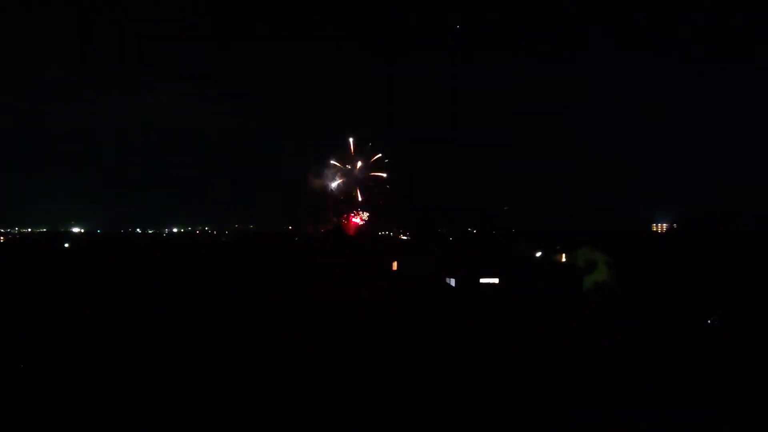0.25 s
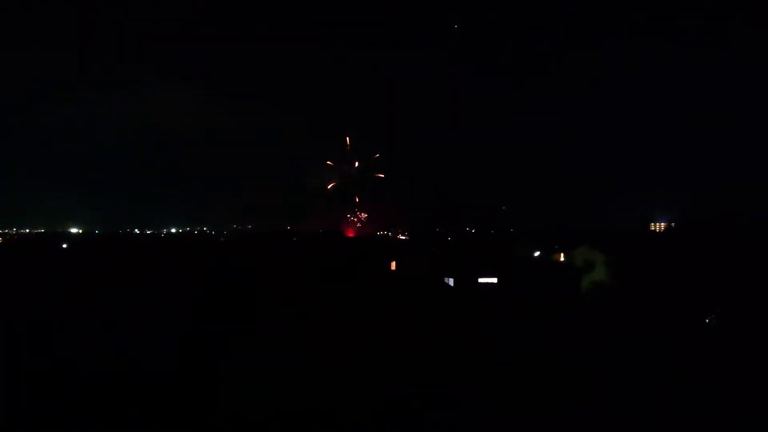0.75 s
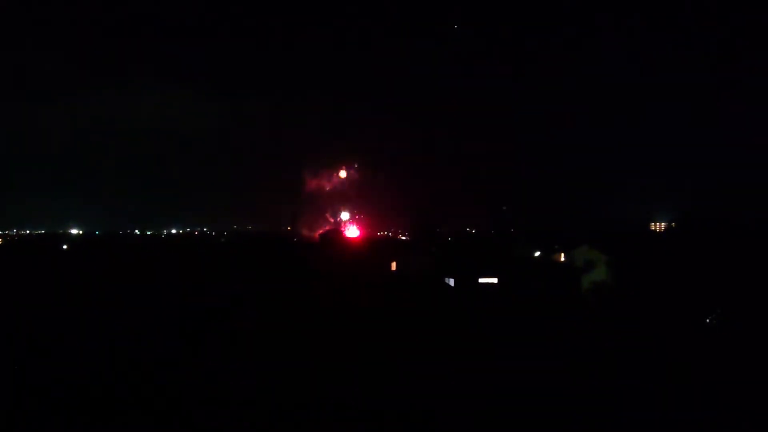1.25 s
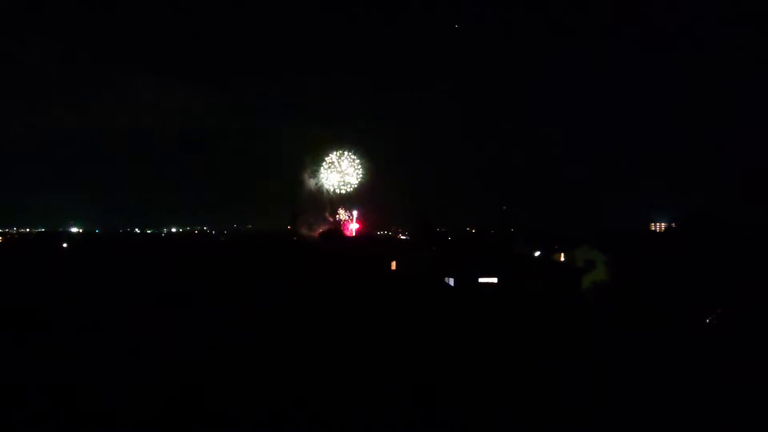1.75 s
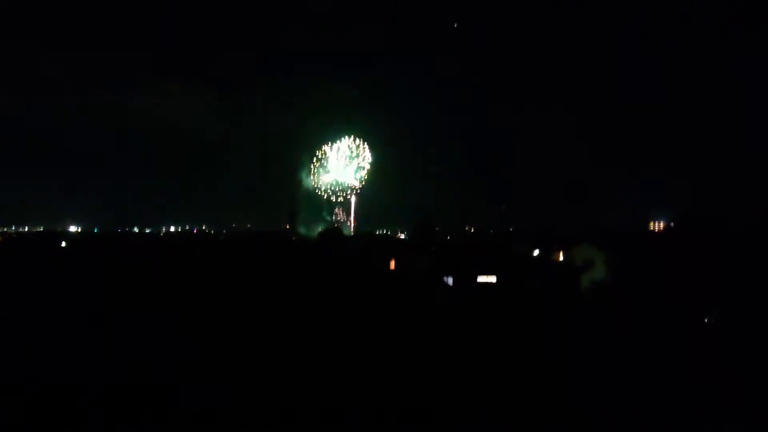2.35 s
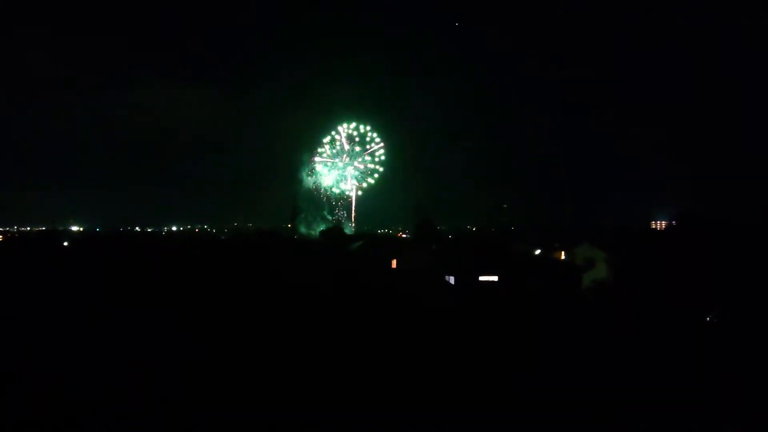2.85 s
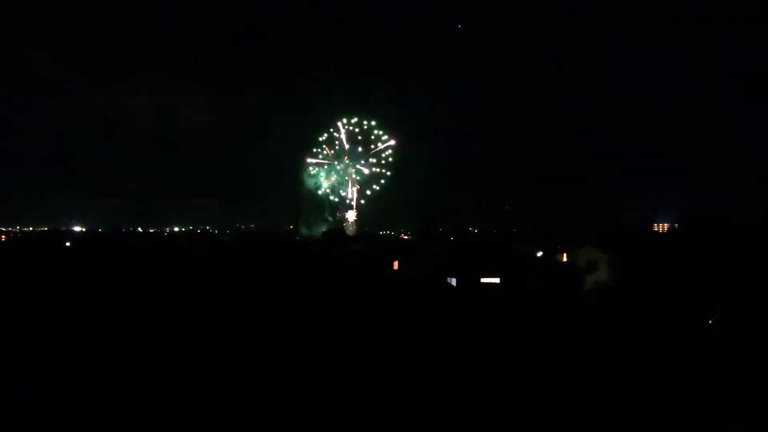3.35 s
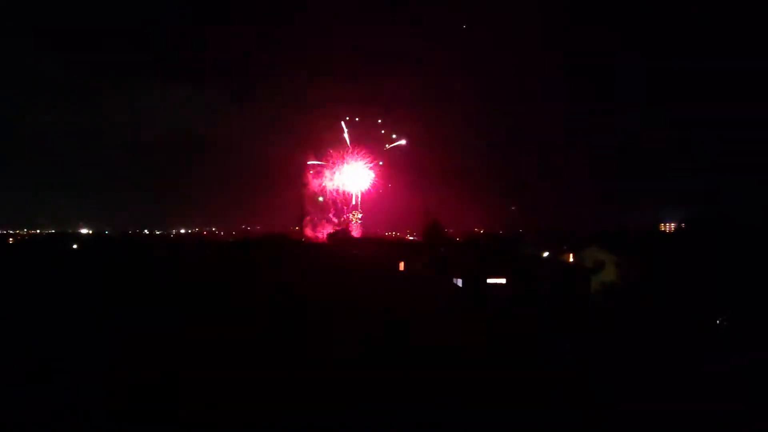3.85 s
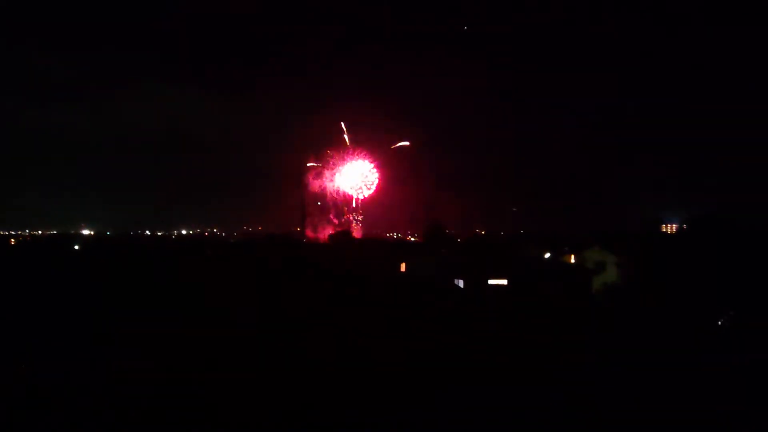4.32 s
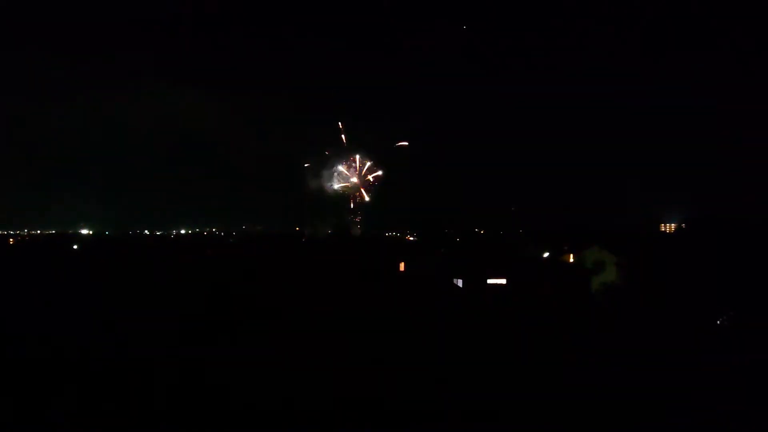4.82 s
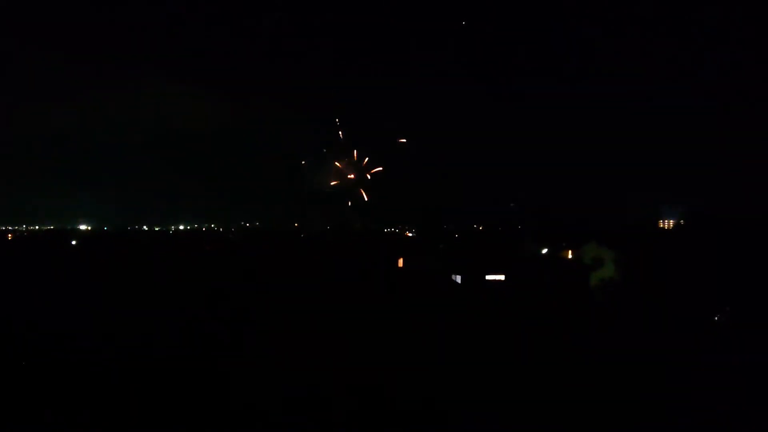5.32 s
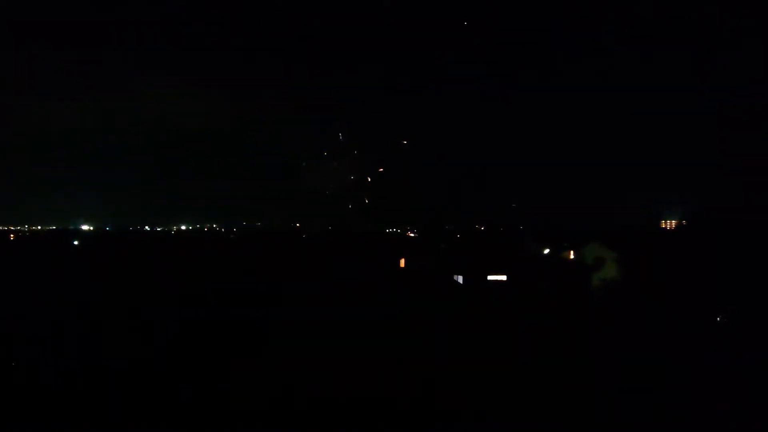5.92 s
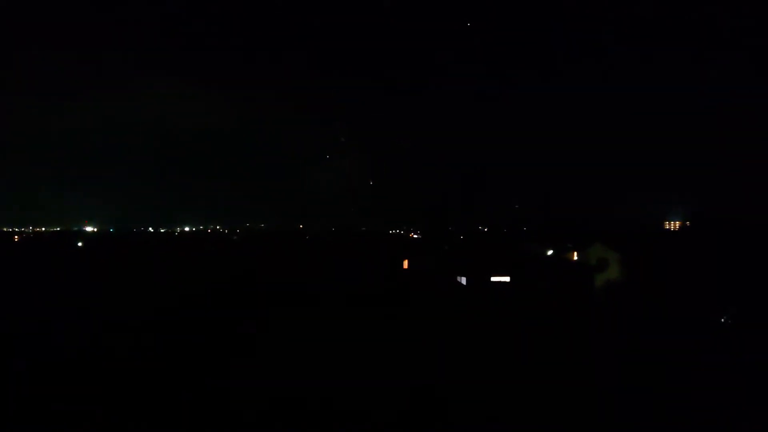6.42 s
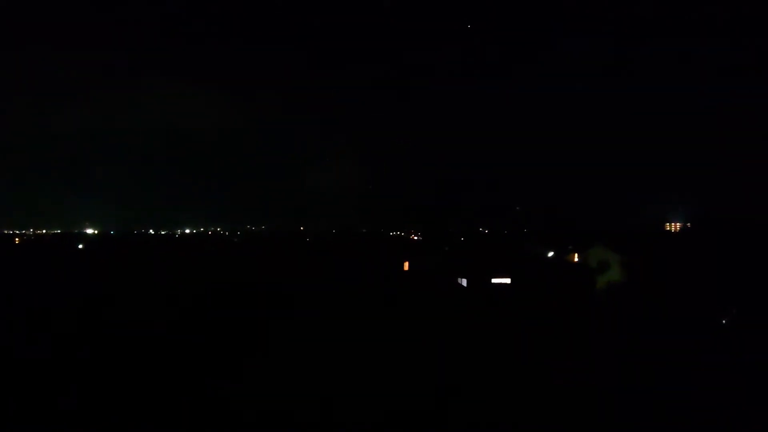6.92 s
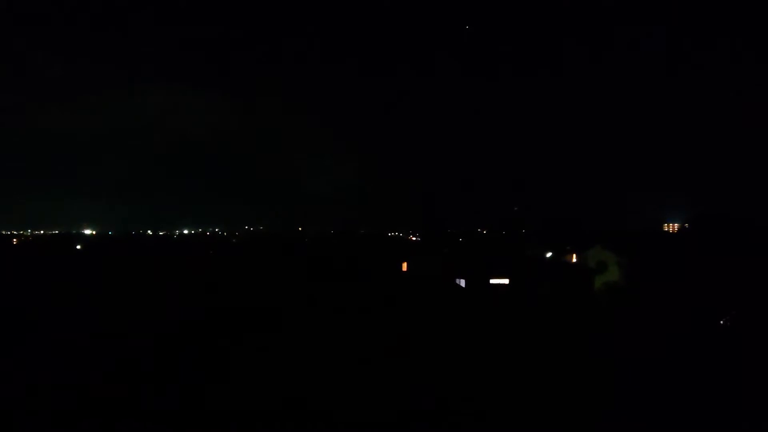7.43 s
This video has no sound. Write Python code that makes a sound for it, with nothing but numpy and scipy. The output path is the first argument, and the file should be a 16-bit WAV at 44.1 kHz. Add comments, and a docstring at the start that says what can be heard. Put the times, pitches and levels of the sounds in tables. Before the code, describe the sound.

Heard from a hillside garden at night, far fireworks burst over a town. An earlier boom's roll fades under small pops and a bush cricket's dry ticks, then heavy booms arrive irregularly, each slapping off nearby walls and rolling over the land. A field cricket briefly swells on the right. Insect hiss and traffic murmur continue; the stereo microphone ducks after the big blasts.

```python
"""Firework shells burst far off over a town at night, heard from a hillside garden.
The roll of an earlier shell fades under faint pops and a bush cricket's ticks (0.5-1.9 s).
Booms at 1.2, 1.9, 4.3, 5.1 and 6.9 s, weaker ones between: N-waves, wall slaps, then noise rolls off the land.
A near field cricket, swept wing tones on the right, swells at 2.2-2.6 s and stops.
Noise-band insects and town murmur last throughout; a limiter ducks everything after the big booms."""
import sys
import numpy as np
from scipy import signal
from scipy.fft import rfft, irfft
from scipy.io import wavfile
from scipy.ndimage import uniform_filter1d, minimum_filter1d

SR = 44100
rng = np.random.default_rng(int(sys.argv[2]) if len(sys.argv) > 2 else 0)


def dump(signal):
    """Clip the signal to [-1, 1] and save it as 16-bit WAV at the path in sys.argv[1]."""
    limited = np.clip(np.atleast_2d(signal).T, -1, 1)
    pcm = np.round(limited * 32767).astype(np.int16)
    wavfile.write(sys.argv[1], SR, pcm)


N = 338688
TIME_S = np.arange(N) / SR

# Shell bursts, before all filters. Each row: arrival in seconds, level in dB, N-wave length in ms,
# lag of a second air path in ms, shelf gain above 450 Hz in dB, wall slap gain in dB.
SHELL_BURSTS = [(-.33, 11.5, 3.06, .55, 2, 2), (1.1692, 13.5, 4.2, 0.95, .5, 5),
                (1.4779, .5, 2.8, .86, -1, 0), (1.9405, 11.5, 4.04, 0.45, 0.5, 4),
                (2.579, 3.5, 2.7, 1.12, -2.5, -1), (4.2804, 2, 2.45, 1.2, -2.5, 3),
                (4.3360, 14, 2.9, 0.98, -3, 1.5), (5.0618, 17, 5.2, 1.21, -6.5, 3),
                (6.2156, .5, 3, 0.42, -3.5, -1.5), (6.8523, 14.5, 3.93, 0.65, 0.5, 2.5)]
# Faint pops of small charges, before all filters. Each row: start in seconds, level in dB.
SMALL_POPS = [(0.105, -27), (.1885, -30), (.834, -31), (2.4133, -27), (2.794, -37), (4.648, -40),
              (5.7127, -29), (7.3259, -24)]
# Slaps from walls and roofs, inverted where they bend round an edge. Each row: delay in ms,
# level in dB before the burst's slap gain, polarity (sign), extra lag of the right side in ms, low-pass in Hz.
WALL_SLAPS = [(14.7, -15.5, -1, -.4, 1400), (32, -30, -1, .3, 1500), (59.9, -15.5, 1, -.07, 3000),
              (75.5, -22, -1, .2, 250), (101, -23, 1, 0, 250)]
# Colour of the scatter from trees and houses close by. Each row: frequency in Hz, gain in dB.
NEAR_COLOUR = [(40, 12.5), (70, 4), (100, 8), (150, 1.5), (300, -1), (700, 3), (1400, 5.5), (2600, 10),
               (5000, 20), (7000, 20.5), (10000, -23.5)]
# Colour of the long roll from the land. Each row: frequency in Hz, gain in dB.
FAR_COLOUR = [(50, 11.5), (95, 2), (150, 0.5), (280, 3.5), (500, 0), (1000, -1.5), (2000, 4.5), (4000, 1),
              (8000, -83)]
# What air and ground leave of a blast. Each row: frequency in Hz, gain in dB.
AIR_COLOUR = [(30, -18.5), (65, 4), (120, -4), (450, -3), (720, -2.5), (950, -6), (1300, 0.5), (1800, -1),
              (2700, 9), (4000, 17.5), (5500, -16), (7500, -37.5), (12000, -32.5)]
# Colour of the left, then the right microphone port. Each row of each: frequency in Hz, gain in dB.
PORT_COLOURS = [
    [(100, -0.95), (700, -2), (1400, -4), (2400, -10.5), (4000, -25.5), (5600, 5.5), (6600, -0.5)],
    [(100, -3), (700, -1), (1400, -4.5), (2400, -0.5), (4000, -18), (5600, 15), (6600, 18)],
]
# Far field crickets that sing throughout. Each row: strokes per second, pitch offset in Hz,
# mean level in dB before panning.
FAR_FIELD_CRICKETS = [(12, -140, -67.5), (18, -30, -65.5), (16.4, -90, -65.5), (11, 140, -68)]
# A bush cricket's runs of ticks. Each row: first tick in seconds, length in seconds,
# level in dB before scatter and the 1 dB noise level.
BUSH_TICK_RUNS = [(.532, .13, -55.5), (0.711, 1.21, -53)]
# Low voices of the far insects, relative spectrum. Each row: frequency in Hz, level in dB.
CHORUS_COLOUR = [(1200, -23), (2000, -2), (2700, 9), (3300, 7), (3750, 6), (4300, 1), (5100, 10.5),
                 (5600, 0), (6500, -11), (7500, -43)]
# High insect voices and bush cricket ticks, relative spectrum. Each row: frequency in Hz, level in dB.
SIZZLE_COLOUR = [(8000, -36.5), (10000, -12.5), (11300, -3.5), (12400, 1.5), (14000, -1.5), (15700, -5.5)]
# Steady trills. Each row: mean frequency in Hz, width in Hz, level in dB before panning,
# left minus right in dB.
STEADY_TRILLS = [(1456, 55, -75.2, 17.5), (2980, 99, -67, -14.5), (3700, 280, -70.5, -22.5),
                 (5320, 76, -69, -15.5)]
# Murmur of the town, relative spectrum. Each row: frequency in Hz, level in dB.
TOWN_COLOUR = [(25, -46.5), (45, 2), (65, 4.5), (110, -1.5), (260, -2.5), (400, -9.5), (560, -17.5),
               (780, -11.5), (950, -21), (1400, -22.5), (2000, -23.5), (5000, -30.5), (6500, -74.5)]

RISE_SHARE = 0.12  # front rise time constant / wave length
FRONT_AT_0_DB_HZ, FRONT_OCTAVES_PER_DB = 4300, 0.14  # stronger blasts keep a sharper front
BASS_CUT_AT_0_DB_HZ, BASS_OCTAVES_PER_DB = 97, 0.25  # small shells carry less bass
SECOND_PATH_DB, CRACK_DB = -9, 2.5
NEAR_ROLL_DB = 3.5
FAR_ROLL_AT_0_DB_DB, FAR_ROLL_DB_PER_DB = 2.5, -0.1021  # far roll varies less than the blast
PORT_LAG_MS = .09  # right port hears the blasts later

STROKE_START_HZ, STROKE_FALL_HZ, STROKE_S = 4070, 620, .042
PHRASE_STROKES_PER_S = 15.1
PHRASE_START_S, PHRASE_PEAK_S, PHRASE_END_S = 2.233, 2.51, 2.615
PHRASE_PEAK_DB, PHRASE_SWELL_DB_PER_S = -51, 36  # peak before flutter and panning
TICK_FIRST_GAP_S, TICK_GAP_GROWTH_S = .0525, .00035
TICK_WIDTH_S, TICK_SCATTER_DB = 0.0083, 0.5
RECORDER_TOP_HZ = 15650


def fireworks():
    """Each blast arrives directly, slaps off walls and rolls over the land; small charges only pop."""
    lead_s = 1  # an earlier shell is still rolling at the start
    blast, near, far = np.zeros((3, 2, N + lead_s * SR))
    for arrival_s, db, length_ms, lag_ms, bright_db, slap_db in SHELL_BURSTS:
        start_s = arrival_s + lead_s
        wave = blast_wave(db, length_ms, bright_db)
        direct = through_air(wave, lag_ms)
        add(blast, start_s, direct)
        add(blast, start_s, undb(slap_db) * slaps(direct))
        # the roll comes over so many paths that their colours even out
        near_echoes, far_echoes = landscape()
        near_roll = signal.oaconvolve(near_echoes, wave[None], axes=1)
        far_roll = signal.oaconvolve(far_echoes, wave[None], axes=1)
        add(near, start_s, undb(NEAR_ROLL_DB) * near_roll)
        add(far, start_s, undb(FAR_ROLL_AT_0_DB_DB + FAR_ROLL_DB_PER_DB * db) * far_roll)
    for arrival_s, db in SMALL_POPS:
        add(blast, arrival_s + lead_s, n_wave(db, length_ms=2.4, rise_ms=0.042))
    sound = colour(blast + colour(near, NEAR_COLOUR) + colour(far, FAR_COLOUR), AIR_COLOUR)
    sound[1] = np.roll(sound[1], round(PORT_LAG_MS * SR / 1000))
    # the ports lose the deep bass, so each wave swings back past zero
    sound = butter(sound, hz=158.6, kind="high", order=2)
    ports = np.vstack([colour(side, port) for side, port in zip(sound, PORT_COLOURS)])
    return ports[:, lead_s * SR:]


def blast_wave(db, length_ms, bright_db):
    """A shell's N-wave: long waves rise slowly, weak ones lose both edge and weight."""
    wave = n_wave(db, length_ms, RISE_SHARE * length_ms)
    front_hz = FRONT_AT_0_DB_HZ * 2 ** (FRONT_OCTAVES_PER_DB * db)
    bass_cut_hz = BASS_CUT_AT_0_DB_HZ / 2 ** (BASS_OCTAVES_PER_DB * db)
    wave = butter(wave, front_hz, "low", order=2)
    wave = butter(wave, bass_cut_hz, "high", order=2)
    return wave + (undb(bright_db) - 1) * butter(wave, hz=450, kind="high", order=1)


def n_wave(db, length_ms, rise_ms, rear_ms=0.58, size=2048):
    """A steep pressure front, a straight fall into suction and a softer return."""
    ms = np.arange(size) * 1000 / SR
    front = 1 - np.exp(-ms / rise_ms)
    fall = 1 - 2 * ms / length_ms
    rear = (1 - np.tanh((ms - length_ms) / (2 * rear_ms))) / 2
    return undb(db) * front * fall * rear


def through_air(wave, lag_ms, fold_db=-21, fold_s=0.0044):
    """Uneven air splits the wave over two paths, frays its front and sharpens its crack."""
    split = wave.copy()
    add(split, lag_ms / 1000, wave * undb(SECOND_PATH_DB))
    fold_decay = np.exp(-TIME_S[:len(wave)] / fold_s)
    folds = undb(fold_db) * rng.standard_normal(len(wave)) * fold_decay
    frayed = np.convolve(wave, folds)[:len(wave)]
    split += butter(frayed, hz=1060, kind="high", order=2)
    return split + (undb(CRACK_DB) - 1) * butter(split, hz=796, kind="high", order=1)


def slaps(wave, bass_cut_hz=110):
    """Dulled copies of a wave from nearby walls, which are too small for the deepest bass."""
    wave = butter(wave, bass_cut_hz, "high", order=1)
    out = np.zeros((2, SR // 4))
    for delay_ms, db, polarity, right_lag_ms, top_hz in WALL_SLAPS:
        echo = np.sign(polarity) * undb(db) * butter(wave, top_hz, "low", order=1)
        add(out[0], delay_ms / 1000, echo)
        add(out[1], (delay_ms + right_lag_ms) / 1000, echo)
    return out


def landscape(near_db=-51, near_t60_s=0.82, near_onset_s=0.041, yard_db=-43, yard_t60_s=0.16,
              far_db=-58, far_t60_s=3.18, far_onset_s=0.053, patchy_db=3, grain_db=2.4):
    """Echo noise of one burst: the yard scatters first, then trees and houses, and the land in uneven swells."""
    t = TIME_S[:2 * SR]
    yard = undb(yard_db - 60 * t / yard_t60_s) * (1 - np.exp(-t / .001))
    since_onset_s = t - near_onset_s
    trees = undb(near_db - 60 * since_onset_s / near_t60_s) * (1 + np.tanh(since_onset_s / .022)) / 2
    trees = trees * undb(grain_db * walk(250)[:len(t)])
    land = undb(far_db - 60 * t / far_t60_s) * (1 - np.exp(-t / far_onset_s))
    swells = undb(patchy_db * walk(30.3)[:len(t)])
    # things in the yard are too small to throw back the bass
    yard_echoes = butter(diffuse(400, len(t)) * yard, hz=298, kind="high", order=2)
    near = yard_echoes + diffuse(600, len(t)) * trees
    return near, diffuse(800, len(t)) * land * swells


def crickets(wander_db=1.5, unsteady_strokes=.2):
    """Far field crickets waver in timing and level; a near one swells briefly and stops."""
    phrase_db = PHRASE_PEAK_DB - PHRASE_SWELL_DB_PER_S * np.maximum(PHRASE_PEAK_S - TIME_S, 0)
    singing = (TIME_S > PHRASE_START_S) & (TIME_S < PHRASE_END_S)
    since_stroke_s = (TIME_S - PHRASE_START_S) % (1 / PHRASE_STROKES_PER_S)
    out = singing * field_cricket(since_stroke_s, 0, phrase_db)
    for strokes_per_s, offset_hz, db in FAR_FIELD_CRICKETS:
        stroke_phase = (TIME_S * strokes_per_s + unsteady_strokes * walk(4)) % 1
        out += field_cricket(stroke_phase / strokes_per_s, offset_hz, db + wander_db * walk(2))
    return out


def field_cricket(since_stroke_s, offset_hz, db, waver_hz=25, rough_hz=35, flutter_db=2.5):
    """Each wing stroke is a short, slightly rough tone that sinks as the wing slows."""
    along = np.minimum(since_stroke_s / STROKE_S, 1)
    hz = STROKE_START_HZ + offset_hz - STROKE_FALL_HZ * along
    hz = hz + waver_hz * walk(14) + rough_hz * walk(400)
    song = np.sin(np.pi * along) * np.sin(2 * np.pi * np.cumsum(hz) / SR)
    return song * undb(db + flutter_db * walk(25)) * pan(-24.5)


def bush_cricket():
    """Runs of dry, very high wing ticks in noise; each gap is a little longer than the one before."""
    ticks = np.zeros(N)
    for start_s, length_s, db in BUSH_TICK_RUNS:
        tick_s, gap_s = start_s, TICK_FIRST_GAP_S
        for scatter in rng.standard_normal(40):  # at most 40 ticks a run
            if tick_s < start_s + length_s:
                bell = np.exp(-np.minimum(((TIME_S - tick_s) / TICK_WIDTH_S) ** 2, 20))
                ticks += undb(db + TICK_SCATTER_DB * scatter) * bell
            tick_s += gap_s
            gap_s += TICK_GAP_GROWTH_S
    return level(colour(diffuse(760), SIZZLE_COLOUR), db=1) * ticks


def chorus(low_db=-58, high_db=-60.0):
    """Many far insects blend into two bands of hiss; trills are tones with noise envelopes."""
    waver = undb(.6 * walk(16))
    out = level(colour(diffuse(900), CHORUS_COLOUR), low_db) * pan(-9) * waver
    out += level(colour(diffuse(900), SIZZLE_COLOUR), high_db) * pan(-1.5)
    for mean_hz, width_hz, db, pan_db in STEADY_TRILLS:
        flutter = butter(rng.standard_normal((2, N)), width_hz / 2, "low", order=2)
        hz = mean_hz * (1 + .004 * walk(3.4))
        tone = np.sin(2 * np.pi * np.cumsum(hz) / SR)
        out += level(flutter * tone, db) * pan(pan_db)
    return out


def town(db=-51):
    """Far traffic: coloured noise with slow and quicker swells."""
    swell = undb(.7 * walk(2.5) + 1.2 * walk(14))
    return level(colour(diffuse(770), TOWN_COLOUR), db) * swell * pan(2.2)


def undb(db):
    """Decibels to gain."""
    return 10 ** (np.asarray(db) / 20)


def level(x, db):
    """Set the rms level."""
    return x * undb(db) / np.sqrt(np.mean(x ** 2))


def pan(db):
    """Gains of the two channels for a left minus right level."""
    return undb(np.array([[db], [-db]]) / 2)


def butter(x, hz, kind, order):
    """Plain low-pass or high-pass."""
    sos = signal.butter(order, min(hz, SR / 2 - 1), kind, fs=SR, output="sos")
    return signal.sosfilt(sos, x)


def colour(x, points, size=4096):
    """Causal minimum-phase filter through (Hz, dB) points, built from the cepstrum."""
    hz, db = np.transpose(points)
    bin_hz = np.arange(size // 2 + 1) * SR / size
    gain = undb(np.interp(np.log(bin_hz + 1), np.log(hz), db))
    cepstrum = irfft(np.log(gain))
    cepstrum[1:size // 2] *= 2
    cepstrum[size // 2 + 1:] = 0
    response = irfft(np.exp(rfft(cepstrum)))
    return signal.oaconvolve(np.atleast_2d(x), response[None], axes=1)[:, :x.shape[-1]]


def walk(rate_hz):
    """Smooth random wander with a spread near 1."""
    k = int(SR / rate_hz)
    steps = np.repeat(rng.standard_normal(N // k + 1), k)
    return uniform_filter1d(steps, k)[:N]


def diffuse(split_hz, size=N):
    """Noise from all around: alike at both ports in the bass, unrelated in the treble."""
    mid, side = rng.standard_normal((2, size))
    side = butter(side, split_hz, "high", order=1)
    return np.array([mid + side, mid - side])


def add(track, start_s, sound):
    """Mix a sound in at a time."""
    i = int(round(start_s * SR))
    part = sound[..., :max(track.shape[-1] - i, 0)]
    track[..., i:i + part.shape[-1]] += part


def scene():
    """The fireworks over the night's background."""
    return fireworks() + crickets() + bush_cricket() + chorus() + town()


def record(dry, ceiling=0.67, hold_s=0.19, release_db_per_s=17):
    """A limiter clamps each big boom, holds, then lets the night back in; the top is cut."""
    over_db = 20 * np.log10(np.maximum(np.abs(dry).max(axis=0) / ceiling, 1))
    half = int(hold_s * SR / 2)
    # origin=half makes the window look back only
    held_db = -minimum_filter1d(-over_db, 2 * half + 1, origin=half, mode="constant")
    recovery_db = release_db_per_s * TIME_S
    cut_db = np.maximum.accumulate(held_db + recovery_db) - recovery_db
    limited = dry * undb(-uniform_filter1d(cut_db, size=24))
    top_cut = signal.ellip(12, .1, 80, RECORDER_TOP_HZ, fs=SR, output="sos")
    return signal.sosfilt(top_cut, limited)


dry = scene()
out = record(dry)
dump(out)
```